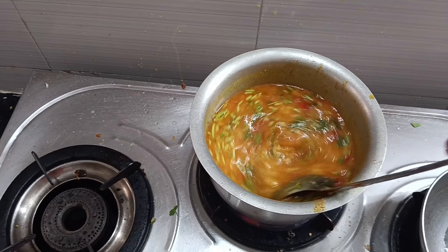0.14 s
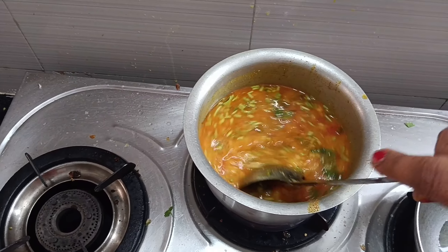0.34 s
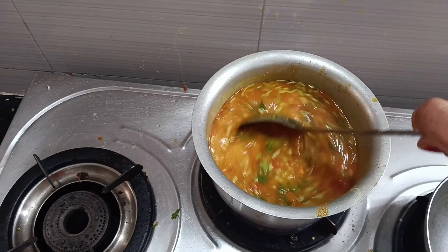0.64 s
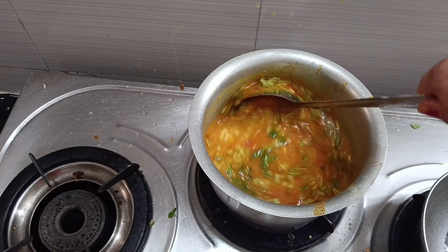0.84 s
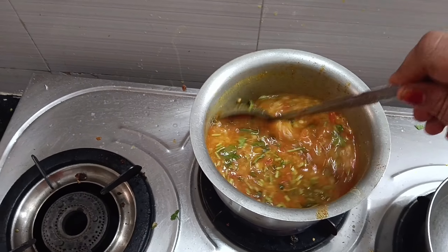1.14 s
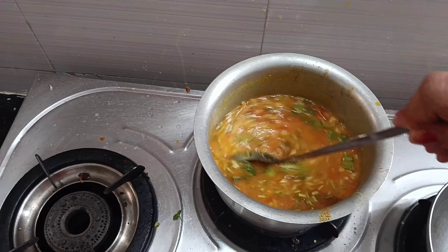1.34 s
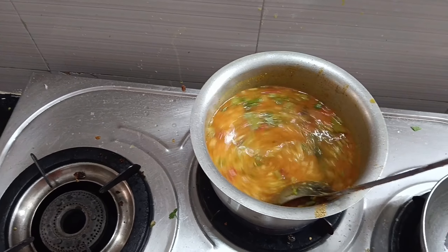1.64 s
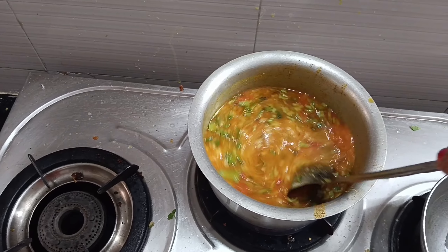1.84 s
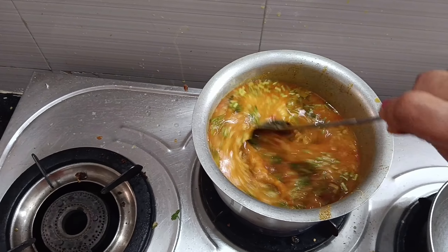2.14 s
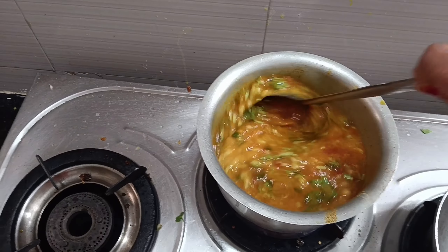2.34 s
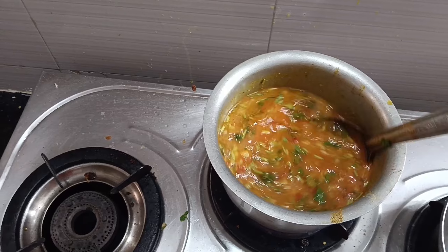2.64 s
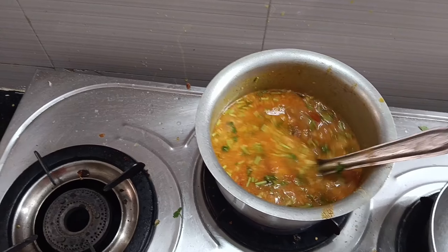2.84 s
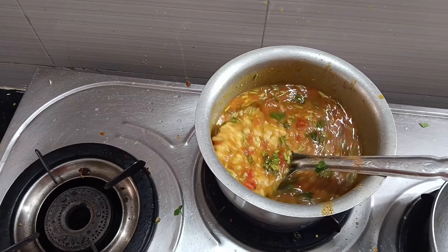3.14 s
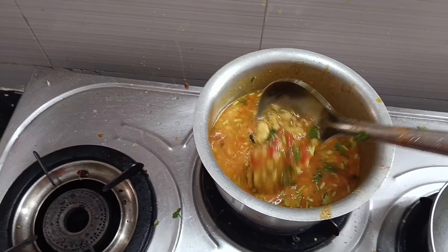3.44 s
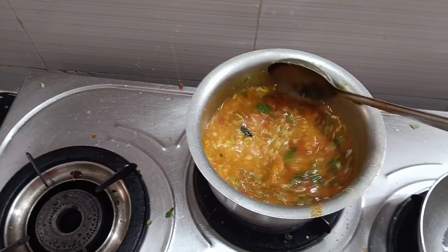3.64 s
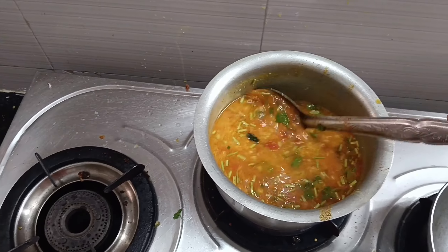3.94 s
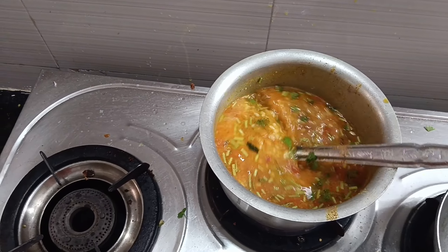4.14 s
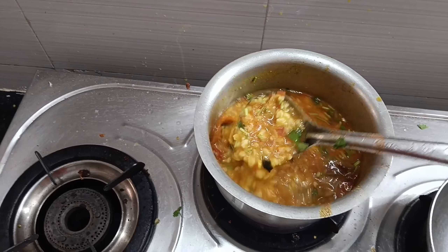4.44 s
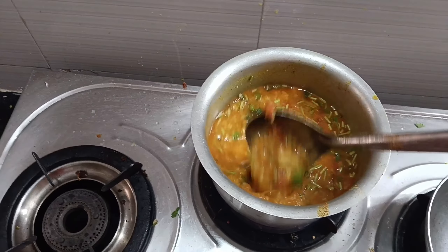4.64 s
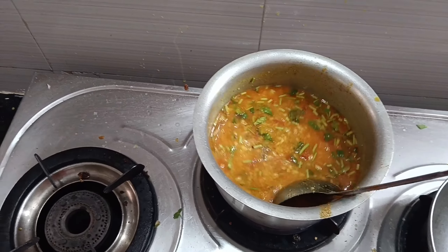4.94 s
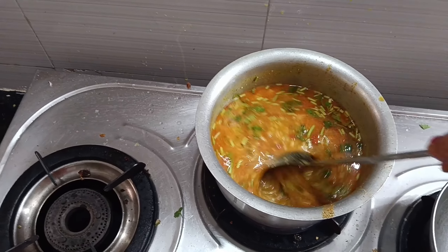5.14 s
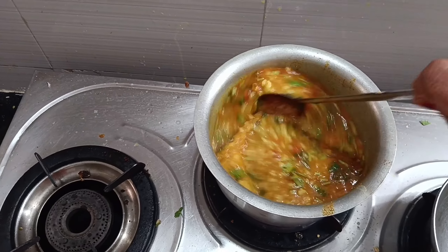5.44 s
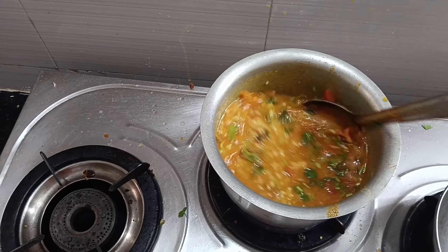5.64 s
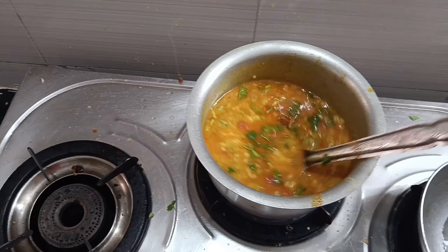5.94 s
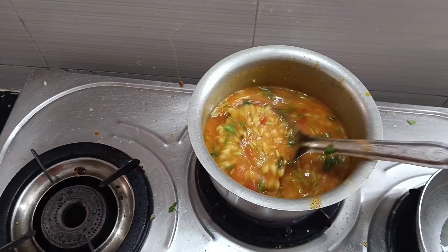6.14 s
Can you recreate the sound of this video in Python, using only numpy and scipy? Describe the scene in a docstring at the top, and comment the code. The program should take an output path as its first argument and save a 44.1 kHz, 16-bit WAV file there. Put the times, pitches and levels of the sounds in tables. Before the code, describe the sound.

Brisk stirring of thick simmering lentils: dull sloshes, short gritty scrapes, damped metal clunks and small wet pops over faint stove hiss.

```python
"""Stirring thick dal on the stove

A steel ladle knocks, scrapes and rubs in an aluminium pot of simmering dal on a gas stove, heard close above.
Contacts are short bursts of noise shaped by the metal; the food-damped pot rings as a set of fading modes.
Sloshes, plops and simmering are made of small bubble tones. The tiled kitchen answers all but a steady hiss."""
import sys
import numpy as np
from scipy import signal
from scipy.fft import rfft, irfft, next_fast_len
from scipy.io import wavfile
from scipy.ndimage import map_coordinates

SR = 44100
rng = np.random.default_rng(int(sys.argv[2]) if len(sys.argv) > 2 else 0)


def output_pcm(signal):
    """Save a mono or channel-first signal as 16-bit PCM at the path in sys.argv[1].

    Samples are clipped to [-1, 1] before scaling.
    """
    pcm = np.clip(np.atleast_2d(signal).T, -1, 1) * 32767
    wavfile.write(sys.argv[1], SR, np.round(pcm).astype(np.int16))


N = 276507  # length in samples

# ways the filled pot can ring: f/Hz, level/dB, t60/s (time to fade by 60 dB)
POT_MODES = [(423, 3, 1), (417, -5, 0.26), (758, 7, 1), (830, -23.5, 0.11), (902, 5.5, 0.085),
             (1042.5, -10, 0.43), (1118, -5.5, 0.37), (1266, 2.5, 0.17), (1452, 3.5, 0.17),
             (1625, -8.5, 0.22), (1920, -15, 0.052), (1911, -2, 0.13), (2435, -13.5, 0.072),
             (3250, -21.5, 0.52), (4950, -25, 0.21)]
# colour of grit and hard edges on metal: f/Hz, level/dB
GRIT_COLOUR = [(1500, -65), (2800, -6), (3700, 2), (4600, -0.5), (5400, 5), (7500, -5.5), (8800, -1.5),
               (10500, -15), (13000, -24.5), (16000, -24)]
# dull colour of the food-laden base and of the dal: f/Hz, level/dB
THUD_COLOUR = [(40, -41), (110, -10), (160, -23), (205, 4), (320, -3.5), (440, 11), (580, -5), (1200, -7),
               (4000, -103)]


def amp(db):
    """Decibels to gain."""
    return 10 ** (np.asarray(db) / 20)


def unit(x):
    """Scale to rms 1."""
    return x / np.sqrt(np.mean(x ** 2) + 1e-20)


def fading(t, t60):
    """Gain that falls by 60 dB every t60 seconds."""
    return np.exp(-np.log(1000) * t / t60)


def along(points, hz):
    """Read values between (Hz, value) points on a log frequency axis."""
    f, v = np.transpose(points)
    return np.interp(np.log(hz + 1), np.log(f + 1), v)


def wobble(rate):
    """A smooth random curve with the given number of knots a second."""
    knots = rng.standard_normal(int(N * rate / SR) + 4)
    return map_coordinates(knots, [np.arange(N) * rate / SR])


def filtered(x, response):
    """Filter x by a complex function of frequency."""
    n = x.shape[-1]
    m = next_fast_len(n + SR // 2)
    return irfft(rfft(x, m) * response(np.fft.rfftfreq(m, 1 / SR)), m)[..., :n]


def coloured(x, spectrum, size=2048):
    """Give x a spectrum with a filter of unit energy that never sounds before its input."""
    cepstrum = irfft(np.log(amp(along(spectrum, np.fft.rfftfreq(size, 1 / SR)))))
    fold = np.r_[1, np.full(size // 2 - 1, 2), np.zeros(size // 2)]  # makes it minimum phase
    h = irfft(np.exp(rfft(cepstrum * fold)))
    return signal.fftconvolve(x, h / np.linalg.norm(h))[:len(x)]


def add(track, s, sound):
    """Mix a sound into a track at time s."""
    part = track[max(round(s * SR), 0):][:len(sound)]
    part += sound[:len(part)]


def swell(t, length, change_db, attack_s, release_s):
    """Gain of one movement: it swells up to t = 0, changes steadily while it lasts, then dies away."""
    attack = np.clip(1 + t / attack_s, 0, 1) ** 2
    release = fading(np.maximum(t - length, 0), release_s)
    return attack * amp(change_db * np.clip(t / length, 0, 1)) * release


def stroke(s, length, change_db, attack_s, release_s):
    """The same gain over the whole scene, for a movement at time s."""
    return swell(np.arange(N) / SR - s, length, change_db, attack_s, release_s)


def slips(rate, spread_db):
    """Tiny impacts at random times, rate a second and of widely varying size, rms 1."""
    struck = rng.random(N) < rate / SR
    sizes = rng.standard_normal(N) * amp(spread_db * np.clip(rng.standard_normal(N), -2, 2))
    return unit(struck * sizes)


def bubble(hz, t60, rise, onset_cycles):
    """An air pocket swells into ringing; its pitch rises by the share rise as it nears the surface."""
    t = np.arange(int(t60 * SR) + 2) / SR
    onset = 1 - np.exp(-(t * hz / onset_cycles) ** 2)
    tone = np.sin(2 * np.pi * hz * t * (1 + rise * t / t60 / 2))
    return tone * fading(t, t60) * onset


def rough_tone(pitch_hz, width_hz):
    """A resonance driven at random: one pitch per sample, blurred over the given width."""
    where = [np.arange(len(pitch_hz)) * width_hz / SR]
    a, b = [map_coordinates(knots, where, mode="wrap") for knots in rng.standard_normal((2, 1024))]
    phase = 2 * np.pi * np.cumsum(pitch_hz) / SR
    return a * np.cos(phase) + b * np.sin(phase)


def shifting(x, depth_db, width_hz, hold_s, size=1024):
    """Bands of pitch come forward and recede at random; the overall loudness is kept."""
    hz, t, z = signal.stft(x, SR, nperseg=size)
    # the bands widen with pitch
    grid = np.meshgrid(np.log1p(hz / 1800) * 1800 / width_hz, t / hold_s, indexing="ij")
    field = map_coordinates(rng.standard_normal((256, 256)), grid, mode="wrap")
    y = signal.istft(z * amp(depth_db * np.tanh(field)), SR, nperseg=size)[1][:N]
    return y * np.std(x) / np.std(y)


def through_pot(x, ring_db):
    """A contact is heard directly and through the wall's resonances, which the pressing ladle damps."""
    ladle_width_hz = 14  # the pressing ladle broadens every resonance

    def response(f):
        ring = 0
        for hz, db, t60 in POT_MODES:
            width = ladle_width_hz + np.log(1000) / np.pi / t60
            ring = ring + amp(db) * 1j * f * width / (hz * hz - f * f + 1j * f * width)
        return 1 + amp(ring_db) * ring

    y = filtered(x, response)
    return y * np.std(x) / np.std(y)


def kitchen():
    """One random answer of the room at each microphone: noise that fades at its own rate per pitch."""
    # how long the room sounds on: f/Hz, t60/s
    room_fade = [(100, 0.066), (500, 0.29), (2000, 0.24), (5000, 0.22), (12000, 0.39)]
    hz, t, z = signal.stft(rng.standard_normal((2, SR // 3)), SR, nperseg=256)
    near_tiles = 1 + 0.99 * np.exp(-t / 0.031)  # the wall right behind the pot answers first
    fade = fading(t, along(room_fade, hz)[:, None])
    tail = signal.istft(z * near_tiles * fade, SR, nperseg=256)[1]
    delay = int(0.001121 * SR)
    return np.pad(tail / np.linalg.norm(tail[0]), ((0, 0), (delay, 0)))


def placed(x, room_db, count=24):
    """Direct sound plus the room's answer, redrawn at random from piece to piece."""
    # strength of the room's answer: f/Hz, level/dB
    room_colour = [(100, -7), (250, -9), (600, 4.5), (2000, 3.5), (4000, 1), (9000, -4.5), (15000, -9.5)]
    wet, step = np.zeros((2, N)), N // count + 1
    padded = np.pad(x, (step, 2 * step))
    fade = np.sin(np.pi * np.arange(2 * step) / step / 2)  # neighbouring pieces overlap
    for start in range(0, N + step, step):
        answer = signal.fftconvolve([padded[start:start + 2 * step] * fade], kitchen(), axes=1)
        for ear, sound in zip(wet, answer):
            add(ear, (start - step) / SR, sound[max(step - start, 0):])
    direct = filtered(x, lambda f: amp(along([(3000, -1), (6000, -5.0)], f)))  # the rim shades the treble
    return direct + amp(room_db) * filtered(wet, lambda f: amp(along(room_colour, f)))


def hiss():
    """A faint uneven rush of noise with a thin high sizzle of tiny pops, the sizzle stronger on the right."""
    # colour of the rush: f/Hz, level/dB
    rush_colour = [(25, -27.5), (60, -6), (150, -0.5), (450, -3), (600, -21), (740, -2.5), (950, -21),
                   (1450, -5.5), (2600, -25.5), (4600, -23.5), (4950, -0.5), (5120, -23), (5350, -3),
                   (6200, -31.5), (9000, -20), (16000, -49)]
    sizzle_colour = [(7000, -12.0), (8700, -5), (9500, 1.5), (10600, 3.0), (11300, 3.5), (12000, -3.0),
                     (15500, -6.0)]  # f/Hz, level/dB
    rush = [shifting(x, depth_db=4, width_hz=169, hold_s=0.15) for x in rng.standard_normal((2, N))]
    fizz = rng.standard_normal((2, N)) + amp(-9.5) * slips(60, spread_db=2.5)
    rush = np.array([coloured(x, rush_colour) for x in rush])
    sizzle = np.array([coloured(x, sizzle_colour) for x in fizz])
    return amp(-65.5) * rush + amp([[-75], [-68.5]]) * sizzle  # sizzle: left, right


def squelch(count=1100):
    """Little air pockets squeezed out of the dal, each ringing a few cycles; rms 1."""
    out = np.zeros(N)
    for when, pitch, size in rng.random((count, 3)):
        hz = 850 * 5 ** pitch
        pop = bubble(hz, 28 / hz, rise=0.057, onset_cycles=1.0)
        add(out, when * N / SR, amp(42 * size - 9 * pitch) * pop)
    return unit(out)


def scrape():
    """The ladle sticks and slips over the metal and the wet lentils caught under it."""
    # drags over the metal: t/s, length/s, level/dB, change along the stroke/dB,
    # bite of the edge/dB and grit/dB (both on top of the level)
    drag_strokes = [(0, 0.027, -41.5, -22.5, -4.5, 0), (0.346, 0.23, -44.5, -6, -8, -14),
                    (0.597, 0.21, -48, 1.5, 4, 0.5), (1.261, 0.18, -45.5, -16.5, 3, -1.5),
                    (1.807, 0.08, -41.5, -8.5, 5.5, 2.5), (1.897, 0.12, -39.5, -3.5, -4.5, -13),
                    (2.037, 0.26, -48.5, 6, -2, -11), (2.453, 0.0068, -51, -12.5, -15.5, 11.5),
                    (2.654, 0.051, -61.5, 0.5, -12.5, -16), (2.742, 0.12, -33.5, -11, -3.5, -1),
                    (2.874, 0.31, -63, -5.5, -0.5, -20.5), (3.146, 0.086, -42, -5, -16.5, -20),
                    (3.395, 0.2, -59.5, -4.5, -26, -24.5), (3.646, 0.064, -64, -17, 17, 24),
                    (3.775, 0.011, -38.5, 4, -34, -30.5), (3.978, 0.1, -37, -5, -12, -15),
                    (4.257, 0.15, -44.5, -16.5, -13, -9), (4.669, 0.14, -61.5, 2.5, -2, 2.5),
                    (4.983, 0.055, -32, 1, -18, -18), (5.064, 0.12, -38, -2, -10.5, -10),
                    (5.19, 0.25, -47.5, 3, 0, -6.5), (5.721, 0.076, -47, -12, 8.5, 2),
                    (5.834, 0.14, -38, -15, -2.5, -6), (6.011, 0.065, -67.5, -10.5, 17, -3.5),
                    (6.09, 0.29, -52.5, -13, 4, -4.5)]
    # the bare edge on metal: f/Hz, level/dB
    bite_colour = [(900, -47.5), (1700, -1.5), (2100, -4.5), (2600, -3.5), (3200, -9.5), (3800, -9.5),
                   (5000, -9.5), (9000, -66.5)]
    # the bowl of the ladle sliding on dal: f/Hz, level/dB
    cushioned_colour = [(150, -19), (430, -11.5), (620, -26.5), (760, -0.5), (1050, -4), (1600, 1),
                        (2000, -17.5), (2600, -25), (6000, -43.5)]
    bowl, edge, gritty = np.zeros((3, N))
    for s, length, db, change_db, bite_db, grit_db in drag_strokes:
        push = amp(db) * stroke(s, length, change_db, attack_s=0.012, release_s=0.17)
        bowl += push
        edge += amp(bite_db) * push
        gritty += amp(grit_db) * push
    pressure = amp(1.44 * wobble(45) + 0.74 * wobble(14))
    catches = amp(-7) * slips(110, spread_db=5.0)  # now and then the edge snags
    contact = (slips(950, spread_db=1.5) + catches) * pressure
    body = coloured(contact * bowl * amp(-9.0), cushioned_colour)
    body = body + coloured(contact * edge * amp(-0.5), bite_colour)
    grains = (slips(1500, spread_db=4.5) + catches) * gritty * pressure
    grit = coloured(grains * amp(-4.0), GRIT_COLOUR)
    # bands of pitch come forward and recede at random
    metal = shifting(through_pot(body, ring_db=8.0) + grit, depth_db=9.0, width_hz=115.7, hold_s=.08)
    return metal + amp(-4.5) * np.sqrt(bowl * edge) * squelch()


def slosh(count=520):
    """Pushed by the ladle, the thick dal folds over: a dull churn full of small low gulps."""
    # waves of dal: crest t/s, length/s, level/dB, change along the wave/dB, swell before the crest/s
    dal_waves = [(0, 0.09, -40, -7, .01), (0.263, 0.044, -64, 3, 0.047), (0.38, 0.088, -35, -20.5, 0.024),
                 (0.48, 0.18, -50.5, 3.5, 0.041), (0.687, 0.19, -61.5, 4.5, .03),
                 (0.971, 0.063, -59.5, 6, 0.017), (1.309, 0.14, -40.5, -10.5, 0.094),
                 (1.608, 0.11, -54, -5.5, 0.1), (1.899, 0.27, -29.5, -32, 0.06),
                 (2.24, 0.063, -66, -3, 0.26), (2.489, 0.043, -53, -4, 0.084),
                 (2.666, 0.047, -46.5, -1, 0.0077), (2.764, 0.12, -41.5, 4, 0.07),
                 (3.12, 0.013, -57, 12, 0.15), (3.151, 0.072, -33.5, -5, 0.013),
                 (3.487, 0.19, -57.5, -21, 0.11), (3.986, .13, -35.5, -0.5, 0.019),
                 (4.329, 0.039, -34.5, -5, 0.13), (4.476, 0.015, -45.5, -3.5, 0.032),
                 (4.659, 0.019, -46, -13, 0.16), (5.032, 0.017, -33, -12, 0.041),
                 (5.078, 0.15, -30.5, -16.5, 0.012), (5.65, 0.02, -50, 1, 0.049),
                 (5.726, 0.24, -40.5, -2, .012), (6.118, .13, -29.5, -14.5, 0.021)]
    flow = np.zeros(N)
    for s, length, db, change_db, swell_s in dal_waves:
        flow += amp(db) * stroke(s, length, change_db, swell_s, release_s=0.17)
    gulps = np.zeros(N)
    for slot, (when, pitch, size) in enumerate(rng.random((count, 3))):
        hz = 185 * 2.7 ** pitch
        gulp = bubble(hz, 22 / hz, rise=0.14, onset_cycles=1.0)
        add(gulps, (slot + when) * N / count / SR, amp(10 * size) * gulp)
    churn = coloured(slips(700, spread_db=4.5), THUD_COLOUR)
    return flow * (amp(-4.5) * unit(gulps) + amp(-4.5) * unit(churn))


def simmer(count=700):
    """Faint bubbles keep breaking the surface at random times."""
    out = np.zeros(N)
    for when, pitch, size in rng.random((count, 3)):
        hz = 380 * 13 ** pitch
        pop = bubble(hz, 30 / hz, rise=0.05, onset_cycles=0.75)
        add(out, when * N / SR, amp(-64 + 9.0 * size ** 2 - 5 * pitch) * pop)
    return out


def rub():
    """Friction drives resonances of the bowl, whose pitch glides with the ladle's depth in the dal."""
    # singing rubs: t/s, length/s, level/dB, change along the stroke/dB, f/Hz, glide/(Hz per s), width/Hz
    rub_strokes = [(0.171, 0.11, -70.5, 13, 702, 22, 100.6), (0.368, 0.32, -51.5, -13, 890, 4, 109),
                   (.41, 0.12, -44.5, -0.5, 432, -12, 108), (0.382, 0.16, -49, -25, 1700, -6, 904),
                   (0.506, 0.076, -60, 3.5, 3000, 1500, 1298), (0.634, 0.17, -41.5, -18, 787, 295, 132.5),
                   (.74, 0.13, -46.5, -21, 1800, 902, 402), (1.254, 0.2, -50, -3.5, 1640, -500, 295.5),
                   (1.285, 0.059, -54, 7, 1150, 1900, 108), (1.344, 0.16, -48, -8, 680, 8, 59),
                   (1.48, 0.22, -56, -19.5, 1480, -2, 248), (1.521, 0.13, -52.5, -17, 740, -250, 87),
                   (1.944, 0.11, -36, -9, 793, -250, 129.5), (2.058, 0.19, -60.5, 3.5, 2800, 0, 1800),
                   (2.233, 0.063, -42, 1.5, 778.4, 147, 132), (2.36, 0.15, -70, 3, 800, -100, 69.7),
                   (2.759, 0.042, -32, -14, 771, -150, 131), (2.921, 0.2, -59, -5, 430, 500, 71.7),
                   (3.085, .05, -54, 1.5, 900, -400, 298), (3.85, 0.09, -43, -7, 445, -4, 45),
                   (4.3, 0.094, -53, -3.5, 1201, 0, 801), (4.28, .06, -61.5, -5, 2930, 0, 790),
                   (5.135, 0.22, -46.5, -12, 874, -600, 131), (5.28, 0.03, -40.5, -10, 767, 299, 130),
                   (5.369, 0.1, -38.5, -12.5, 801, 636, 125.6), (5.757, 0.012, -37, -14, 753, -3, 133),
                   (5.844, 0.15, -45, -8.5, 897, 2, 133), (5.852, 0.012, -36, -6, 1550, 0, 440),
                   (5.838, 0.052, -47, -20, 3700, 0, 810), (6.02, 0.2, -61.5, 3, 4700, 8, 378),
                   (6.04, 0.065, -54, -7, 1750, 0, 703), (6.13, .11, -54, -14, 902, 3, 203),
                   (6.15, 0.11, -67, -3, 3500, -2, 598)]
    attack_s, release_s = 0.026, 0.038  # the release is a t60
    out, t = np.zeros(N), np.arange(SR // 2) / SR - attack_s
    for s, length, db, change_db, hz, glide, width in rub_strokes:
        tone = rough_tone(hz + glide * np.clip(t, 0, length), width)
        gain = amp(db + 2.0) * swell(t, length, change_db, attack_s, release_s)
        add(out, s - attack_s, gain * tone)
    return out


def clinks():
    """The ladle's edge or spatter rattles for a moment on the metal, in one broad resonance."""
    # short rough clinks: t/s, level/dB, f/Hz, width/Hz, t60/s
    clink_hits = [(0.346, -26, 912, 205, 0.073), (.604, -39, 3330, 1430, .07), (.964, -55, 2394, 900, 0.19),
                  (1.893, -20, 2090, 1190, 0.028), (2.448, -44, 3560, 694, 0.069),
                  (2.578, -45, 3430, 920, .1), (2.585, -50, 1436, 350, .18), (2.66, -48, 1610, 910, 0.22),
                  (2.748, -31.5, 1614, 252, .1), (3.776, -31, 784, 330, 0.085),
                  (3.79, -46, 1238, 605, 0.43), (3.977, -26, 3840, 1100, 0.016),
                  (4.393, -44.5, 5160, 1080, .04), (4.435, -55.5, 3680, 900, 0.062),
                  (4.476, -51.5, 2185, 500, 0.053), (4.524, -52.5, 1560, 300, .06),
                  (4.576, -58, 2280, 500, .05), (4.676, -34.5, 2070, 1290, .1), (4.7, -42, 1440, 500, 0.21),
                  (4.735, -42, 2370, 1090, 0.12), (4.992, -19.5, 3260, 2000, .02),
                  (4.995, -32, 1515, 1000, 0.087), (5.783, -37, 2480, 400, 0.046),
                  (5.807, -33, 2450, 500, .04)]
    out, t = np.zeros(N), np.arange(SR // 4) / SR
    onset = 1 - np.exp(-t / 0.00084)
    for s, db, hz, width, t60 in clink_hits:
        tone = rough_tone(np.full(len(t), hz), width)
        add(out, s, amp(db - 1.0) * tone * onset * fading(t, t60))
    return out


def knocks():
    """Each strike chatters briefly on the wall and thumps the food-laden base."""
    # ladle strikes the pot: t/s, level/dB, thud/dB and treble/dB (both on top of the level), chatter t60/s
    knock_hits = [(0.349, -29, 19, -16, 0.05), (0.604, -43.5, -24, -2, 0.27),
                  (0.785, -33.5, -20, -2, 0.023), (0.963, -62.5, -10, 6.5, 0.15),
                  (1.249, -48.5, -5, -8, 0.51), (1.405, -34, -24, -31, 0.022),
                  (1.434, -36, -18, -11, 0.032), (1.471, -42, -18, -12, 0.018),
                  (1.671, -54, -13, -13.5, 0.044), (1.803, -20, -28, 5, 0.012), (1.892, -16, 8, -10, 0.02),
                  (2.309, -37, 6.5, -9.5, 0.052), (2.45, -61.5, -16.5, 18.5, 0.073),
                  (2.579, -50, 21, -2.5, 0.21), (2.659, -47.5, -16, 0.5, 0.29),
                  (2.739, -35, -12, 9.5, 0.052), (2.809, -28, -23, -0.5, 0.04),
                  (2.944, -37, -19.5, -2.5, 0.0085), (3.144, -34.5, 12, -4, 0.14),
                  (3.3, -61, -15, 12, 0.057), (3.411, -61, -23, 10.5, 0.026),
                  (3.776, -40.5, -24, 9.5, 0.0159), (3.977, -32.5, -4, 2, 0.044),
                  (4.993, -13, 6, -8, 0.015), (5.038, -33, -12, -4.5, 0.021), (5.07, -15, 17, -13.5, 0.044),
                  (5.317, -31.5, -11, -17.5, 0.058), (5.721, -41, 4, 6.5, 0.098),
                  (5.784, -44.5, -17, -3.5, .02), (5.807, -35, -17, 6.5, 0.015),
                  (5.841, -39.5, -30, 0.5, 0.11), (6.093, -37.5, -20, 8, .022)]
    # colour of the struck wall: f/Hz, level/dB
    metal_colour = [(150, -51), (620, -28.5), (760, 2), (1600, 4.5), (2500, -6), (3600, -10), (4600, -27.5),
                    (9000, -65)]
    wall, base, edge = np.zeros((3, N))
    t = np.arange(SR // 3) / SR
    for s, db, thud_db, treble_db, t60 in knock_hits:
        chatter = rng.standard_normal((3, len(t))) * amp(db) * fading(t, t60)
        add(wall, s, chatter[0])
        add(base, s, chatter[1] * amp(thud_db - 26.5))
        add(edge, s, chatter[2] * amp(treble_db - 0.5))
    metal = through_pot(coloured(wall, metal_colour), ring_db=-6.0) + coloured(edge, GRIT_COLOUR)
    # bands of pitch come forward and recede at random
    metal = shifting(metal, depth_db=10.5, width_hz=136.3, hold_s=0.2084)
    return metal + coloured(base, THUD_COLOUR)


def plops():
    """Single bubbles burst and drops fall from the ladle, each a short tone of rising pitch."""
    # bubbles and drops: t/s, level/dB, f/Hz
    plop_drops = [(0.359, -26.5, 205), (.41, -27, 442), (0.607, -25, 1600), (0.628, -29, 192),
                  (0.97, -28, 221), (1.264, -38.5, 207), (1.356, -41, 675), (1.405, -41, 653),
                  (1.804, -5.5, 3015), (1.804, -10.5, 2024), (2.668, -28, 230), (2.792, -32, 215),
                  (3.159, -31, 228), (3.179, -31, 417), (3.63, -31, 4260), (3.634, -8, 5790),
                  (3.645, -12.5, 3190), (3.649, -29, 2090), (3.777, -27.5, 826), (3.795, -22.5, 442),
                  (3.992, -24.5, 228), (4.642, -34.5, 3910), (4.676, -19.5, 1630), (4.677, -28, 2550),
                  (4.716, -22.5, 4400), (4.731, -23, 2280), (4.736, -24.5, 916), (4.787, -20.5, 1045),
                  (4.823, -30.5, 2280), (4.864, -24.5, 4160), (4.954, -21, 1126), (4.991, -8.5, 1960),
                  (4.992, -16, 1140), (5.08, -28.5, 197), (5.689, -34.5, 1700), (5.725, -24.5, 215),
                  (5.966, -31.5, 385), (6.094, -20, 2585), (6.094, -13, 5380), (6.111, -23, 260),
                  (6.124, -26.5, 423), (6.256, -28, 1660)]
    cycles, longest_s = 27.7, 0.067  # a bubble dies away in so many cycles; thick dal cuts big ones short
    out = np.zeros(N)
    for s, db, hz in plop_drops:
        onset_cycles = 2.55 * (hz / 1000) ** 0.37
        drop = bubble(hz, min(cycles / hz, longest_s), rise=0.14, onset_cycles=onset_cycles)
        add(out, s, amp(db + 6.0) * drop)
    return out


def ticks():
    """Spatter and metal give very short bright cracks of noise."""
    # sharp little ticks: t/s, level/dB
    tick_hits = [(0.604, -31.5), (1.803, -49.5), (2.453, -31), (2.973, -42), (3.297, -37.5), (3.659, -30.5),
                 (3.777, -43), (3.978, -36.5), (4.49, -44), (4.679, -39.5), (4.785, -26), (4.991, -37),
                 (5.655, -49), (6.093, -30)]
    out, t = np.zeros(N), np.arange(SR // 100) / SR
    for s, db in tick_hits:
        add(out, s, amp(db + 7.5) * rng.standard_normal(len(t)) * np.exp(-t / 0.00043))
    return coloured(out, [(1500, -27.0), (4000, -21.0), (8000, -2.5), (11000, -7.0), (15500, -11.5)])


def rocking():
    """Hard pushes rock the heavy pot on its stand with a soft rumble of low noise."""
    # rocking pushes: t/s, level/dB, length/s
    rock_pushes = [(0.604, -51, 0.11), (1.892, -61, 0.11), (3.135, -50, 0.062), (4.288, -58, 0.22),
                   (5.042, -47.5, 0.14)]
    push = np.zeros(N)
    for s, db, length in rock_pushes:
        add(push, s, amp(db) * signal.windows.tukey(int(length * SR)))
    rumble_colour = [(25, -25), (55, -7), (85, 9.0), (105, 0), (135, 24.0), (220, -28), (1000, -54)]
    return coloured(push * rng.standard_normal(N), rumble_colour)


def rings(reach_db=50, others_db=-8):
    """Cushioned bumps ring the pot's modes near one pitch, tuned afresh for each bump and drifting a little."""
    # the wall is set ringing: t/s, level/dB, pitch of the main mode f/Hz, extra damping/(dB per s)
    ring_bumps = [(0.791, -31.5, 1450, 10), (0.963, -44, 1905, 17), (1.47, -28.5, 1049, 4.1),
                  (1.471, -34.5, 1470, 12), (1.483, -36, 418.6, 50), (1.672, -34.5, 1033, 130),
                  (1.674, -33.5, 415.4, 135), (1.676, -37, 1434, 10), (1.806, -31, 1012, 240),
                  (1.809, -39.5, 412, 30), (1.895, -26.5, 1073, 39), (2.456, -39, 1519, 23),
                  (2.587, -51, 1370, 12), (2.748, -26, 766.5, 98), (3.409, -46, 1513, 7.1),
                  (3.648, -47, 3215, 62), (3.786, -31, 1128, 2), (3.777, -31.5, 1497, 55),
                  (3.777, -31, 880.5, 2), (3.783, -28.5, 436.4, 5.5), (4.14, -35, 924, 58),
                  (4.229, -42.5, 1570, 180), (5.069, -32, 1122, 60), (5.727, -22.5, 759, 270)]
    free_s, late_fade_db_per_s = 0.13, 230.5  # each ring fades slowly at first, then much faster after free_s
    flutter_db, flutter_top_hz = -1.5, 53.7  # each mode's level wavers, at random rates up to this
    out, t = np.zeros(N), np.arange(SR // 2) / SR
    hz, level, t60 = np.transpose(POT_MODES)[:, :, None]
    late_fade = late_fade_db_per_s * np.maximum(t - free_s, 0)
    onset = 1 - np.exp(-t / 0.0026)
    for s, db, pitch_hz, damping in ring_bumps:
        # the main mode is near in pitch, with long-lived modes favoured
        main = np.argmin(np.abs(hz - pitch_hz) / np.minimum(t60, .2) ** 2)
        octaves_away = np.abs(np.log2(hz / hz[main]))
        strength = np.minimum(level - level[main], 0) - reach_db * octaves_away
        strength = strength + others_db * (hz != hz[main])
        drift = 8 * np.cumsum(rng.standard_normal((len(hz), len(t))), axis=1) / np.sqrt(SR)  # random phase walk
        rate_hz = flutter_top_hz * rng.random(hz.shape)
        flutter = flutter_db * np.sin(2 * np.pi * rate_hz * t + 2 * drift)
        gain = amp(strength + flutter - damping * t - late_fade) * fading(t, t60)
        modes = gain * np.sin(2 * np.pi * hz * pitch_hz / hz[main] * t + drift)
        signs = rng.choice([-1, 1], hz.shape)
        add(out, s, amp(db) * (modes * signs).sum(0) * onset)
    return out


def scene():
    """Scrapes, rubs, sloshes and rocking carry more room; knocks, rings, plops and ticks carry less."""
    ladle = placed(scrape() + rub(), room_db=1.5) + placed(knocks() + clinks(), room_db=-2.5)
    ringing = placed(rings(), room_db=-5.5)
    dal = placed(slosh() + rocking(), room_db=0.5) + placed(plops() + simmer() + ticks(), room_db=-5.0)
    return ladle + ringing + dal + hiss()


def record(dry):
    """The two microphones differ slightly in colour and arrival time, and share a treble notch and a band limit."""
    # colour shared by both microphones: f/Hz, level/dB
    mic_colour = [(100, -8), (5650, -3.5), (5950, -23.5), (6130, -13), (6350, -24), (6700, -8), (7400, 3.5),
                  (8900, -1.5), (9500, -2.5), (10300, 6.5), (16000, -14)]
    # left minus right: f/Hz, level/dB
    left_right_tilt = [(100, 0.5), (300, -2), (1000, -1), (2000, -2), (4000, -0.5), (8000, 7), (12000, -8)]
    lag_ms, top_hz = 0.028, 15900  # the pot is slightly nearer to the right microphone
    side = np.array([[.5], [-.5]])  # left, right

    def response(hz):
        tilt = amp(side * along(left_right_tilt, hz))
        lag = np.exp(-2j * np.pi * hz * side * lag_ms / 1000)
        return tilt * lag * amp(along(mic_colour, hz)) * (hz < top_hz)

    return filtered(dry, response)


dry = scene()
out = record(dry)
output_pcm(out)
```